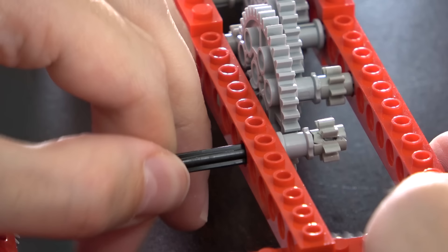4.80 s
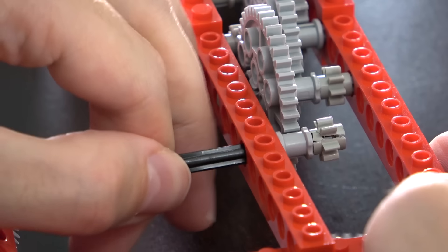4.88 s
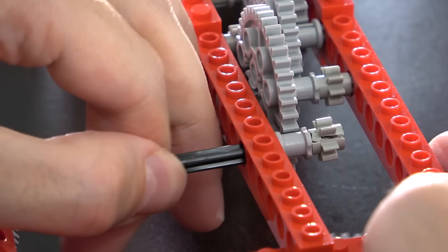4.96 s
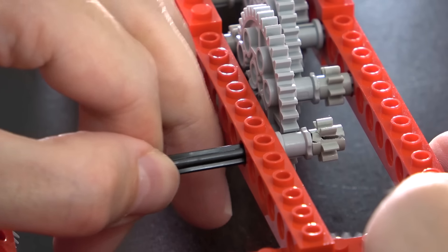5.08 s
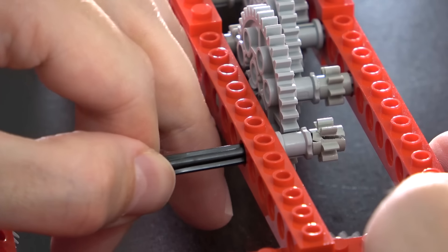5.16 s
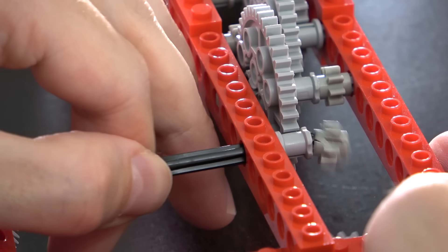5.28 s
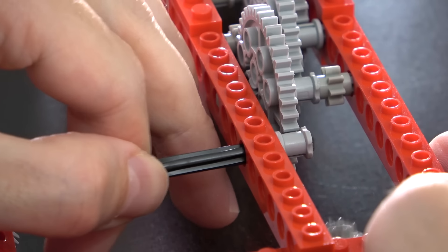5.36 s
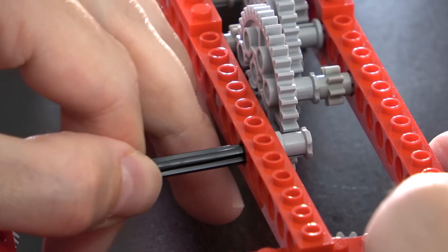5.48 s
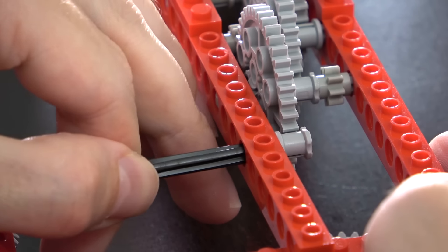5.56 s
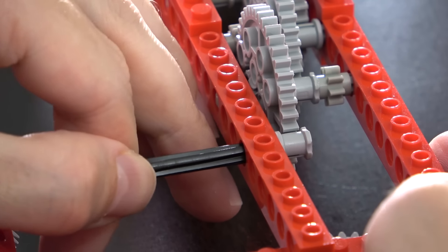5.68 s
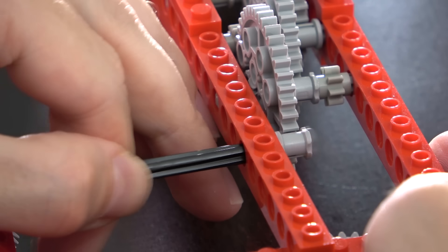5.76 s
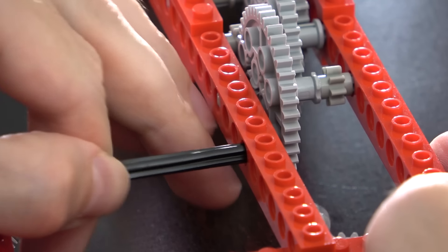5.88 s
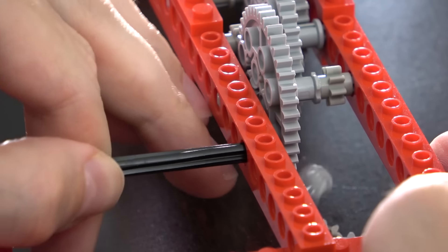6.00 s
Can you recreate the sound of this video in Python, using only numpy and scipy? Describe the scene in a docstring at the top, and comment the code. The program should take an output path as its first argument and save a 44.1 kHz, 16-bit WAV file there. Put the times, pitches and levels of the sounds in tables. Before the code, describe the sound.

Indoors, close up: steady sizzling gear whine with a rapid throb, running down after about two seconds to a dull hiss that cuts dead. A quiet pause holds only faint room rumble, then a hard, sharp crack with a short room tail. Next comes a cluster of irregular woody plastic knocks with dry rasping, a pause with slight creaks, and finally delicate ticks from a small gear dropping free.

```python
"""Toy gear train: run-down, snap and forced axle

A small motor whirs through plastic gears and runs down into a soft rush that stops dead: dense tooth
impacts through resonances, over wavering sine tones. A strained part snaps loudly, as crackle plus ringing.
An axle is then forced by hand, knocking and grinding in the plastic frame with struck resonances and
stick-slip grains, and a small gear comes off with light clicks. A small live room rumbles and answers.
"""
import sys
import numpy as np
from scipy import signal
from scipy.fft import rfft, irfft, next_fast_len
from scipy.io import wavfile
from scipy.ndimage import map_coordinates

SR = 44100
rng = np.random.default_rng(int(sys.argv[2]) if len(sys.argv) > 2 else 0)


def bounce(signal):
    """Save signal as a 16-bit WAV file at the path given by the first command-line argument."""
    frames = np.transpose(np.atleast_2d(signal))
    limited = np.clip(frames, -1, 1)
    pcm = np.round(limited * 32767).astype(np.int16)
    wavfile.write(sys.argv[1], SR, pcm)


N = 265967


def amp(db):
    """Decibels to gain."""
    return 10 ** (np.asarray(db) / 20)


def unit(x):
    """Scale to rms 1."""
    return x / np.sqrt(np.mean(x ** 2) + 1e-20)


def burst(x):
    """Scale a short sound to the energy of 10 ms at rms 1."""
    return x / np.sqrt(np.sum(x ** 2) / (SR / 100) + 1e-20)


def along(points, hz):
    """Interpolate (Hz, value) points on a log frequency axis."""
    f, v = np.transpose(points)
    return np.interp(np.log(hz + 1), np.log(f + 1), v)


def clock():
    """The time of every sample in seconds."""
    return np.arange(N) / SR


def curves(rows):
    """One value per sample for each column after the time."""
    s, *columns = np.transpose(rows)
    return [np.interp(clock(), s, column) for column in columns]


def wobble(rate):
    """A smooth random curve, rate knots a second."""
    knots = rng.standard_normal(int(N * rate / SR) + 4)
    return map_coordinates(knots, [np.arange(N) * rate / SR])


def coloured(x, spectrum, size=4096):
    """Filter x with the (Hz, dB) spectrum, made minimum-phase by folding its cepstrum."""
    gain = amp(along(spectrum, np.fft.rfftfreq(size, 1 / SR)))
    cepstrum = irfft(np.log(gain + 1e-6))
    cepstrum[1:size // 2] *= 2
    cepstrum[size // 2 + 1:] = 0
    response = irfft(np.exp(rfft(cepstrum)))
    return signal.fftconvolve(x, response)[:len(x)]


def band(x, lo_hz, hi_hz, order=3):
    """Causal band-pass."""
    edges = [lo_hz, min(hi_hz, SR / 2 - 1)]
    return signal.sosfilt(signal.butter(order, edges, "band", fs=SR, output="sos"), x)


def ringing(peaks, scatter_db):
    """Decaying sines for (Hz, width Hz, dB) resonances, their balance redrawn at each call."""
    t = np.arange(SR // 4) / SR
    out = np.zeros(len(t))
    for k, (hz, width, db) in enumerate(peaks):
        level = (-1) ** k * width * amp(db + scatter_db * rng.normal())
        out += level * np.exp(-np.pi * width * t) * np.sin(2 * np.pi * hz * t)
    return out


def impacts(rate, spread_db):
    """Tiny impacts at random moments, rate a second, of random sign and uneven size."""
    struck = rng.random(N) < rate / SR
    sign = rng.choice([-1, 1], N)
    return unit(struck * sign * amp(spread_db * rng.standard_normal(N)))


def crackle(length_s, count=3):
    """A dying noise burst; each of count rounds evens out its spectrum and shortens it again."""
    t = np.arange(SR // 4) / SR
    x = rng.standard_normal(len(t)) * amp(-60 * t / length_s)
    for _ in range(count):
        z = rfft(x)
        x = irfft(z / (np.abs(z) + 1e-9), len(t)) * np.exp(-(t / length_s) ** 2)
    return x


def tone(hz, waver_hz):
    """A slightly unsteady sine of rms 1."""
    return unit(np.sin(2 * np.pi * np.cumsum(hz + waver_hz * wobble(21.85)) / SR))


def add(track, s, x):
    """Mix x into the track at time s."""
    part = track[round(s * SR):][:len(x)]
    part += x[:len(part)]


RUSH_END = 2.645  # s, where the rush has stopped
FLOOR_DB = -55  # the room's rumble
# Colour of the room's rumble and hiss. Each row: frequency in Hz, relative level in dB per Hz.
FLOOR_COLOUR = [(15, -27.5), (42, -5), (59, -8.5), (160, -20.5), (300, -24), (580, -30), (1950, -41),
                (15800, -54)]


def floor():
    """Wide room rumble and faint hiss from shaped noise, coming up in the last 11 ms of the rush."""
    mid, side = (unit(coloured(rng.standard_normal(N), FLOOR_COLOUR)) for _ in range(2))
    level = amp(FLOOR_DB) * np.clip((clock() - RUSH_END) / 0.011 + 1, 0, 1)
    return level * (mid + amp(-8.0) * np.array([side, -side]))


# Decay of the room. Each row: frequency in Hz, time to fall 60 dB in seconds.
ROOM_DECAY = [(150, 0.69), (1000, 0.68), (2700, 0.54), (5500, .47), (8000, 0.392), (12000, 0.3)]
# Strength of the room's answer. Each row: frequency in Hz, relative level in dB.
ROOM_LEVEL = [(150, 3), (330, 2), (700, -1.5), (1000, -2.5), (2500, -8.5), (5000, -10.5), (10000, -12),
              (15000, -21)]
# Tones that the room holds on to. Each row: frequency in Hz, width in Hz, relative level in dB.
ROOM_TONES = [(290, 6, -9), (340, 5, -5), (590, 10, -10), (764, 7, -6), (971, 8, -9), (1104, 9, -11),
              (1766, 12, -15)]


def echo(x):
    """A diffuse room tail whose treble is weaker and dies sooner, with a few lingering tones."""
    hz, t, z = signal.stft(rng.standard_normal(SR * 3 // 4), SR, nperseg=256)
    t60 = along(ROOM_DECAY, hz)[:, None]
    shape = amp(-60 * t / t60) * (1 - np.exp(-t / 0.0051))  # builds up softly, then decays
    shape *= amp(along(ROOM_LEVEL, hz))[:, None] / np.sqrt(np.mean(shape ** 2, axis=1, keepdims=True))
    tail = signal.istft(z * shape, SR, nperseg=256)[1]
    tail /= np.sqrt(len(tail))
    add(tail, .005, amp(14) * 2 * np.pi / SR * ringing(ROOM_TONES, scatter_db=2.5))
    return signal.fftconvolve(x, tail)[:N]


# The low rush that outlasts the gears. Each row: time in seconds, level in dB before its slight wobble.
RUSH_LEVEL = [(1.2, -47), (1.8, -43), (2.25, -45.5), (2.64, -46.5)]
# Colour of the rush. Each row: frequency in Hz, relative level in dB per Hz.
RUSH_COLOUR = [(30, -17), (85, -9), (450, -8.5), (680, -6), (900, -13.5), (1020, -2), (1340, -1),
               (1490, -22), (4600, -28.5), (5800, -23), (10000, -26), (15500, -33.5)]


def rush():
    """A dull rush with a thin hiss above it, shaped from noise and cut off within 8 ms."""
    noise = unit(coloured(rng.standard_normal(N), RUSH_COLOUR))
    level_db = curves(RUSH_LEVEL)[0] + 0.92 * wobble(22.1)
    return noise * amp(level_db) * np.clip((RUSH_END - clock()) / 0.0076, 0, 1)


MOTOR_HUM_HZ, GEAR_HUM_HZ, IDLER_HUM_HZ = 140, 339.5, 242.5
IDLER_HUM_DB = -2.5  # against the motor hum
# Hum of the drive before wobble and fade. Each row: time in seconds, motor hum in dB, gear hum in dB.
HUM_LEVEL = [(0, -53.5, -58), (.45, -57.5, -63), (.55, -63.5, -54), (1, -63.5, -77), (1.3, -59.5, -51),
             (1.8, -54.5, -55), (2.15, -62.5, -67)]


def hum():
    """The motor and its first gears hum as three low, slightly unsteady sines."""
    motor_db, gear_db = curves(HUM_LEVEL)
    lines = (MOTOR_HUM_HZ, motor_db), (IDLER_HUM_HZ, motor_db + IDLER_HUM_DB), (GEAR_HUM_HZ, gear_db)
    return sum(tone(hz, waver_hz=1.8) * amp(db + 3.3 * wobble(11.9)) for hz, db in lines)


SHAFT_HZ, MOTOR_HZ = 5.82, 29.7  # turns a second of the slow shaft and of the motor
# an off-centre gear binds once a turn: first tight spot (s), swell (dB), narrowness
TIGHT_S, TIGHT_DB, TIGHT_NARROW = .03, 6.2, 3.6
UNLOADED_S = 2.1  # the slowing gears no longer bind
RIPPLE_S, RIPPLE_DB = 0.105, 1.42  # a pinion, three times as fast, ripples the sizzle: first crest, depth
WHINE_DB = -4.5  # against the clatter
# The running gears before swell and flutter. Each row: time in seconds, clatter in dB, tooth sizzle in dB.
DRIVE_LEVEL = [(0, -34, -29), (1.75, -34.5, -29), (1.95, -41.5, -34), (2.05, -46, -47.5), (2.2, -55, -72)]
# Colour of the tooth impacts. Each row: frequency in Hz, relative level in dB per Hz.
TOOTH_COLOUR = [(70, -29), (190, -31), (480, -14.5), (900, -8.5), (1130, -6.5), (2300, -2), (2700, -5.5),
                (4600, -2), (5350, -6), (6400, 3), (7700, -1.5), (10000, -3.5), (11300, -1), (15800, -13)]
# Resonances of the gear train. Each row: frequency in Hz, width in Hz, relative level in dB.
TRAIN_MODES = [(1141, 24, -0.5), (2417, 35, 0), (2967, 89, -0.5), (3614, 110, -5.5), (4370, 220, -0.5),
               (6830, 570, 2), (10950, 350, 0.5)]
# Tones of the meshing teeth. Each row: frequency in Hz, level in dB relative to the other tones.
MESH_TONES = [(410, -62), (565, -56.5), (660, -56), (839.8, -53), (1157, -48.5), (1270, -55.5),
              (1696, -46.5), (1836, -51), (2180, -53), (2401, -48.5), (2498, -50), (3591, -49.5),
              (4317, -47), (4495, -54.5), (7316, -46), (12218, -60)]


def gears():
    """Dense tooth impacts ring the train, swelling at the tight spot of each turn, over wavering mesh tones."""
    t = clock()
    clatter_db, sizzle_db = curves(DRIVE_LEVEL)
    binding = np.exp(TIGHT_NARROW * (np.cos(2 * np.pi * SHAFT_HZ * (t - TIGHT_S)) - 1))
    load_db = TIGHT_DB * (binding * (t < UNLOADED_S) - binding.mean())
    ripple_db = RIPPLE_DB * np.cos(3 * 2 * np.pi * SHAFT_HZ * (t - RIPPLE_S))
    flutter = np.cos(2 * np.pi * MOTOR_HZ * (t - .017))

    teeth = unit(coloured(impacts(rate=9000, spread_db=1.5), TOOTH_COLOUR))
    train_ring = ringing(TRAIN_MODES, scatter_db=1)
    train = unit(signal.fftconvolve(impacts(rate=3000, spread_db=4.0), train_ring)[:N])
    body = teeth + amp(-5.5) * train

    clatter = unit(band(body, 71, 3480)) * amp(clatter_db + load_db + .5 * flutter)
    sizzle_db = sizzle_db + ripple_db + 0.37 * flutter + 0.7 * wobble(24.94)
    sizzle = unit(band(body, 2830, 26000)) * amp(sizzle_db)
    whine = np.zeros(N)
    for hz, db in MESH_TONES:
        whine += amp(db + 3.3 * wobble(33.97)) * tone(hz, waver_hz=min(0.00606 * hz, 12))
    return clatter + sizzle + unit(whine) * amp(clatter_db + WHINE_DB)


# The groan of the slowing gears before wobble. Each row: time in seconds, pitch in Hz, level in dB.
GROAN = [(1.79, 704, -60), (1.815, 678, -39), (1.86, 613, -41.5), (1.88, 605, -56), (1.903, 661, -47),
         (1.94, 640, -55), (2.02, 554, -62)]


def run_down():
    """The slowing gears groan as a wavering sine, and the frame bumps softly as they catch."""
    hz, db = curves(GROAN)
    voice = unit(np.sin(2 * np.pi * np.cumsum(hz + 10 * wobble(69.9)) / SR))
    groan = voice * amp(db + 3.2 * wobble(50.33))
    t = np.maximum(clock() - 1.925, 0)
    bump = amp(-36.5) * np.sin(2 * np.pi * 115 * t) * amp(-60 * t / 0.075)
    return groan * (clock() > GROAN[0][0]) * (clock() < GROAN[-1][0]) + bump


GRIP_DETUNE = 0.0082  # the changing grip shifts the frame's resonances from knock to knock (share)
# The frame's resonances. Each row: frequency in Hz, width in Hz, relative level in dB.
FRAME_MODES = [(331, 96, -11.5), (590, 50, -3.5), (773, 53, -4.5), (977, 90, -6), (1114, 68, -3),
               (1500, 88, -3), (1808, 56, 3), (2160, 120, -13), (2714, 140, -8.5)]
# Colour of a knock on the frame. Each row: frequency in Hz, relative level in dB per Hz.
KNOCK_COLOUR = [(130, -38.5), (260, -19.5), (580, -12), (800, -1), (1350, -7.5), (1850, -2), (2350, -11.5),
                (3300, -24), (5000, -22.5), (15000, -53)]


def knock():
    """A hard blow on the frame: a short thump and its resonances."""
    thump = burst(coloured(crackle(length_s=0.027), KNOCK_COLOUR))
    modes = np.array(FRAME_MODES) * [1 + GRIP_DETUNE * rng.normal(), 1, 1]
    ring = signal.fftconvolve(crackle(length_s=0.0084), ringing(modes, scatter_db=0.0))
    frame = burst(ring[:SR // 4])
    return burst(band(frame + amp(-1) * thump, 130, 3400))


# Colour of a soft thud through the frame. Each row: frequency in Hz, relative level in dB per Hz.
THUD_COLOUR = [(90, -22), (300, -7.5), (850, 2), (1300, -5.5), (1780, -1.5), (2400, -19.5), (6000, -42)]


def thud():
    """The dull answer of the frame to a light blow, a shaped crackle."""
    return burst(coloured(crackle(length_s=0.082), THUD_COLOUR))


# Ringing of a small gear. Each row: frequency in Hz, relative level in dB, time to fall 60 dB in seconds.
GEAR_MODES = [(3690, -3, 0.019), (4345, -3.5, 0.013), (5730, -2, 0.011), (8840, 1, 0.018),
              (10214, 2.5, 0.009), (11300, 1, 0.012)]


def click(click_db, tick_db, ring_db, length_s, lo_hz):
    """Plastic meets plastic: a noise touch and unevenly struck gear modes, split into click and bright tick."""
    t = np.arange(SR // 4) / SR
    ring = np.zeros(len(t))
    for hz, db, t60 in GEAR_MODES:
        uneven_db = 2.5 * rng.standard_normal()
        ring += amp(db + uneven_db - 60 * t / t60) * np.sin(2 * np.pi * hz * t)
    touch = amp(ring_db) * burst(ring) + burst(crackle(length_s, count=0))
    low_click = burst(band(touch, lo_hz, 5700, order=4))
    high_tick = burst(band(touch, 7600, 12500, order=2))
    return amp(click_db) * low_click + amp(tick_db) * high_tick


SLIP_RING_DB = -11  # a held gear hardly rings; against the noise of the touch
RATTLE_KNOCK_DB, RATTLE_TICK_DB = 3, -12.5  # against the click
# Loose teeth tick between the jumps. Each row: start in seconds, click level in dB.
RATTLE = [(4.054, -53), (4.07, -54), (4.134, -53), (4.197, -52), (4.2987, -48), (4.612, -49.5)]


def rattle():
    """Loose teeth tick and knock the frame lightly while the axle grinds."""
    out = np.zeros(N)
    for s, db in RATTLE:
        tick = click(db, db + RATTLE_TICK_DB, SLIP_RING_DB, length_s=0.019, lo_hz=2500)
        add(out, s, amp(db + RATTLE_KNOCK_DB) * knock() + tick)
    return out


CREAK_THUD_DB, CREAK_TICK_DB = -5.5, -17  # against the level of the creak
# Strained joints give a little. Each row: start in seconds, reference level in dB.
CREAKS = [(2.808, -61), (3.9518, -50), (3.9627, -38.5), (3.971, -42), (3.975, -45), (4.003, -54),
          (4.811, -47.5), (5.178, -57), (5.397, -62), (5.8833, -42), (5.8931, -46), (5.919, -48)]
# Ringing of a strained joint. Each row: frequency in Hz, width in Hz, relative level in dB.
JOINT_MODES = [(3050, 700, 4.5), (3387, 27, 3.5), (5550, 500, -14)]


def creaks():
    """A joint under strain gives with a dry, crisp tick, a thud and a crackle-driven ring."""
    out = np.zeros(N)
    for s, db in CREAKS:
        ring = signal.fftconvolve(crackle(length_s=0.027), ringing(JOINT_MODES, scatter_db=3))
        ring = burst(ring[:SR // 4])
        crunch = click(db - 4.5, db + CREAK_TICK_DB, ring_db=-12.5, length_s=0.022, lo_hz=2190)
        add(out, s, amp(db) * (amp(CREAK_THUD_DB) * thud() + amp(-5) * ring) + crunch)
    return out


THUD_LAG_S = 0.00278  # the frame answers a little after the gear
FREE_S = 5.95  # from here on the small gear is off its axle and its click is thinner and higher
# A small gear is struck as it catches, comes off or lands.
# Each row: start in seconds, click in dB, tick in dB, thud in dB.
GEAR_HITS = [(1.9273, -33, -40, -42.5), (5.4604, -43.5, -40.5, -37.5), (5.4938, -54, -50.5, -47),
             (5.5438, -59, -52, -68), (5.569, -72, -64, -73), (5.671, -67, -72, -72),
             (5.9638, -50, -43, -50), (5.9678, -50, -36, -50.5), (6.007, -60.5, -52, -52),
             (6.012, -67, -55, -53)]


def gear_hits():
    """A free gear ticks brightly; the frame thuds as far as it shares the blow."""
    out = np.zeros(N)
    for s, click_db, tick_db, thud_db in GEAR_HITS:
        lo_hz = 4700 if s > FREE_S else 3300
        add(out, s, click(click_db, tick_db, ring_db=-3.5, length_s=0.011, lo_hz=lo_hz))
        add(out, s + THUD_LAG_S, amp(thud_db) * thud())
    return out


SCRAPE_DB, SCRAPE_LO_HZ, SCRAPE_HI_HZ = -9, 2000, 5640  # dry rasp, against the grinding at its loudest
SCRAPE_GROWS = 4.7  # dB of rasp for each dB of grinding
# The axle scraping through its hole. Each row: time in seconds, level in dB.
GRIND_LEVEL = [(4.021, -79), (4.05, -51), (4.2, -46), (4.28, -58), (4.35, -47), (4.43, -54), (4.46, -36),
               (4.5, -39), (4.655, -41), (4.7, -86)]
# The axle sliding on softly, before its wobble. Each row: time in seconds, level in dB.
SLIDE_LEVEL = [(4.8, -65), (5.5, -69), (6.03, -83)]


def axle():
    """The axle sticks and slips in small steps that shake the frame and rasp, then slides on softly."""
    t = clock()
    forced = (t > GRIND_LEVEL[0][0]) & (t < GRIND_LEVEL[-1][0])
    grind_db, = curves(GRIND_LEVEL)
    steps = impacts(rate=650, spread_db=2.5)
    frame = unit(signal.fftconvolve(steps, ringing(FRAME_MODES, scatter_db=-6.5))[:N])
    grind = unit(unit(coloured(steps, KNOCK_COLOUR)) + amp(-3.5) * frame) * amp(grind_db)

    rasp_db = SCRAPE_DB + grind_db.max() + SCRAPE_GROWS * (grind_db - grind_db.max())
    grains = impacts(rate=1500, spread_db=4)
    rasp = unit(band(grains, SCRAPE_LO_HZ, SCRAPE_HI_HZ, order=2)) * amp(rasp_db)

    slide = unit(band(rng.standard_normal(N), 560, 632, order=2)) * amp(2.6 * wobble(8.3))
    slide *= np.interp(t, [4.6, 4.75], [0, 1]) * amp(curves(SLIDE_LEVEL)[0])
    return (grind + rasp) * forced + slide


REBOUND_S, REBOUND_DB = 0.0058, -5.5  # every jump strikes the frame a second time
# The forced axle jumps forward. Each row: start in seconds, knock in dB, click in dB, tick in dB.
SLIPS = [(4.0286, -19.5, -41, -45.5), (4.1118, -23.5, -43.5, -50.5), (4.1741, -29.5, -49, -59),
         (4.2255, -35.5, -47.5, -55), (4.304, -23, -36.5, -47), (4.4051, -24.5, -37.5, -42.5),
         (4.4528, -35, -40, -48.5), (4.467, -36, -42.5, -64), (4.5214, -35.5, -44.5, -56),
         (4.571, -35, -48.5, -60), (4.6017, -32.5, -50, -63)]


def slips():
    """Each jump of the axle knocks the frame and rebounds more dully."""
    out = np.zeros(N)
    for s, knock_db, click_db, tick_db in SLIPS:
        for at, db in (s, 0), (s + REBOUND_S, REBOUND_DB):
            # the tick loses the rebound level twice, hence the duller sound
            tick = click(click_db, tick_db + db, SLIP_RING_DB, length_s=0.0185, lo_hz=2200)
            add(out, at, amp(db) * (amp(knock_db) * knock() + tick))
    return out


SNAP_RING_DB = -15  # against the crack
JOLT_HZ, JOLT_DB, JOLT_T60_S = 66, -44, 0.8  # the snap jolts the table; level against the crack
# The break, in two stages. Each row: start in seconds, level of the crack in dB.
SNAP_STAGES = [(3.177, -10.5), (3.1804, -17)]
# Colour of the crack. Each row: frequency in Hz, relative level in dB per Hz.
CRACK_COLOUR = [(60, -24), (170, -20), (235, -8.5), (600, -8), (850, -8), (1400, -3), (2300, -1), (4600, 0),
                (5600, -4.5), (7400, -3.5), (10500, 3), (13300, -1), (16000, -15)]
# Ringing of the snapping part. Each row: frequency in Hz, width in Hz, relative level in dB.
SNAP_MODES = [(770, 29, -3.5), (1052, 45, -2), (1390, 55, -1.5), (3050, 350, -5)]


def snap():
    """Strained plastic lets go in a dense crack, treble over first; it rings and the table booms faintly."""
    out = np.zeros(N)
    for s, db in SNAP_STAGES:
        burst_noise = crackle(length_s=0.022)
        low = signal.filtfilt(*signal.butter(2, 5500, fs=SR), burst_noise)
        high = (burst_noise - low) * amp(-60 * np.arange(len(burst_noise)) / SR / 0.067)
        crack = burst(coloured(low + high, CRACK_COLOUR))
        ring = burst(ringing(SNAP_MODES, scatter_db=-5.0))
        add(out, s, amp(db) * (crack + amp(SNAP_RING_DB) * ring))
        boom = np.sin(2 * np.pi * JOLT_HZ * clock() + .5 * wobble(20))
        add(out, s, amp(db + JOLT_DB - 60 * clock() / JOLT_T60_S) * boom)
    return out


def scene():
    """The whir sits dead centre; the handling sounds spread a little through the room."""
    running = np.interp(clock(), [2.05, 2.25], [1, 0])  # fades the gears and the hum
    drive = running * gears() + run_down()
    hand = snap() + slips() + creaks() + gear_hits() + axle() + rattle()
    lead = .14 * np.gradient(hand)  # the left channel hears the hands a few microseconds early
    glance = amp(-16.5) * band(hand, 1000, 3200, order=2)  # the table's reflection differs left and right
    side = amp(-12.5) * echo(hand) + lead + glance
    centre = drive + amp(-5.0) * echo(drive) + running * hum() + rush()
    hands = (hand + echo(hand)) * amp([[.15], [-.15]])  # dB, a touch to the left
    return centre + hands + np.array([side, -side]) + floor()


TOP_HZ = 16050  # the band limit


def record(dry):
    """Peaks are rounded off near full scale; a steep low-pass clears what lies above the band limit."""
    held = dry / (1 + np.abs(dry / .88) ** 6) ** (1 / 6)
    size = next_fast_len(N + SR // 2)
    low_pass = 1 / np.sqrt(1 + (np.fft.rfftfreq(size, 1 / SR) / TOP_HZ) ** 160)
    return irfft(rfft(held, size) * low_pass, size)[:, :N]


dry = scene()
out = record(dry)
bounce(out)
```